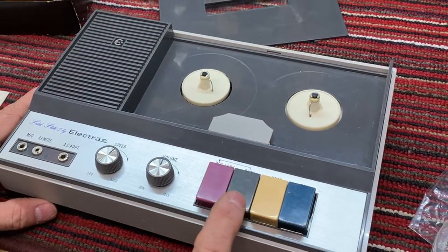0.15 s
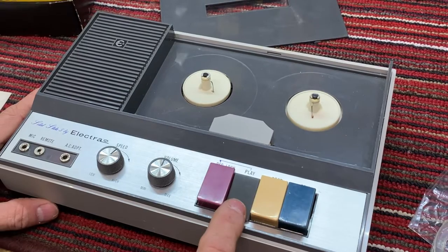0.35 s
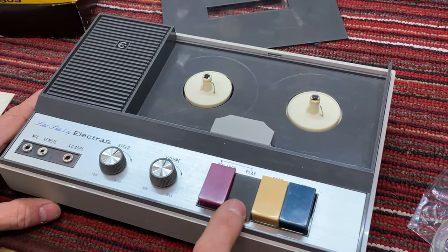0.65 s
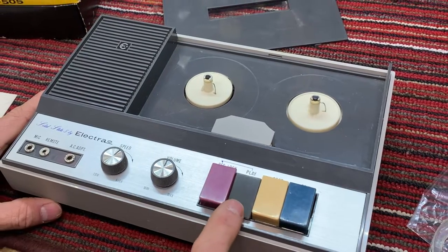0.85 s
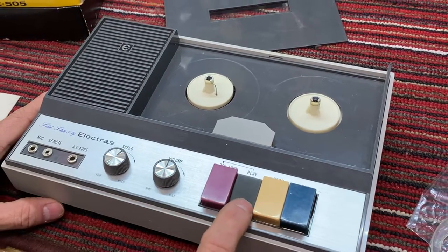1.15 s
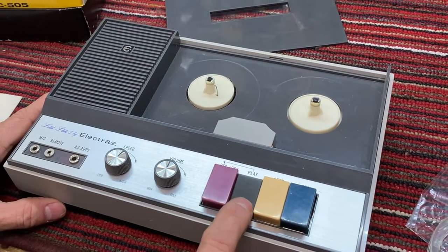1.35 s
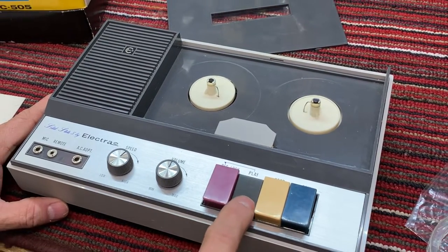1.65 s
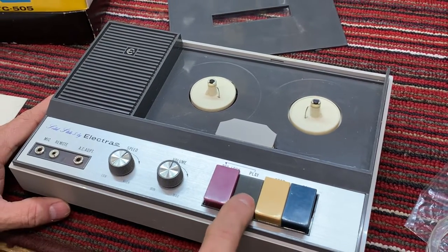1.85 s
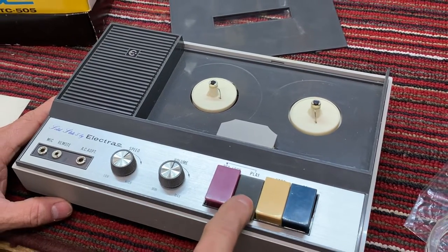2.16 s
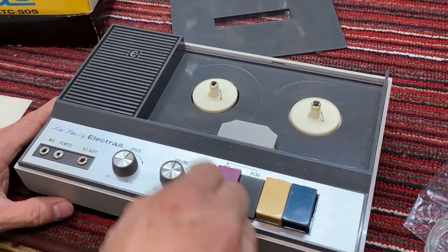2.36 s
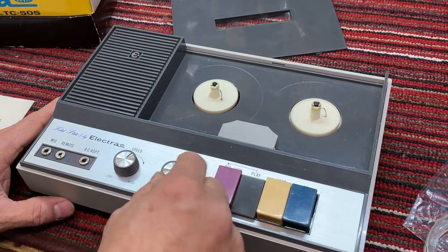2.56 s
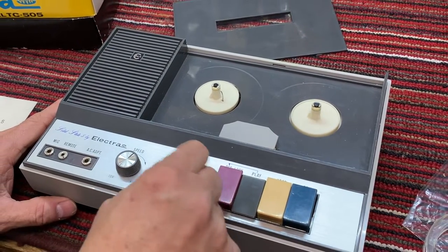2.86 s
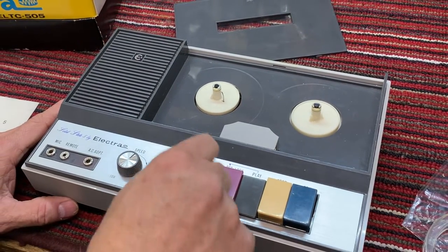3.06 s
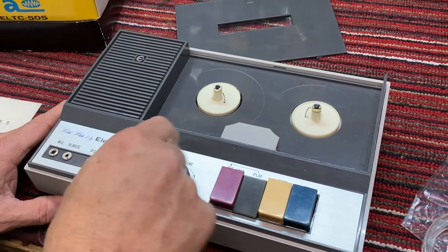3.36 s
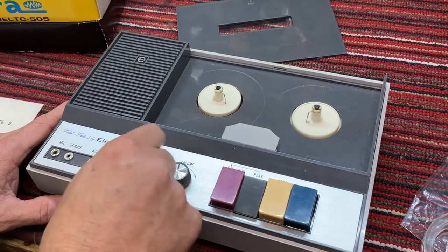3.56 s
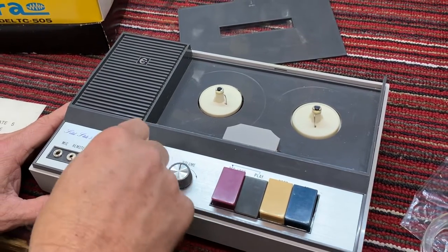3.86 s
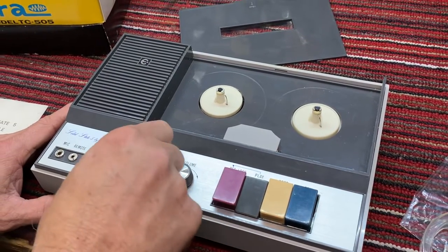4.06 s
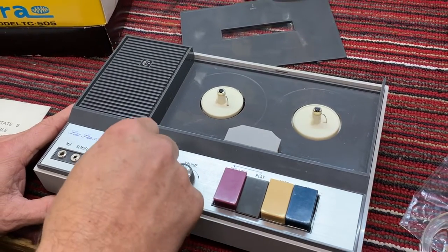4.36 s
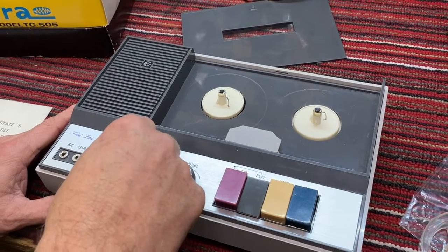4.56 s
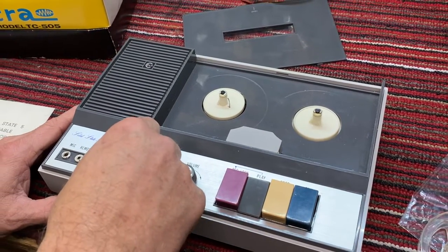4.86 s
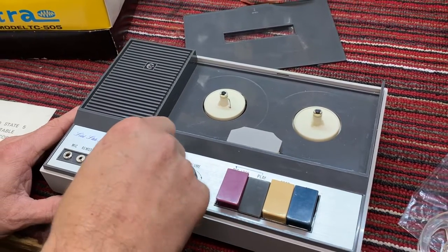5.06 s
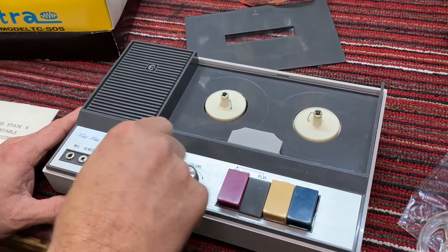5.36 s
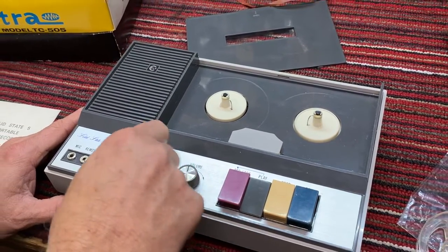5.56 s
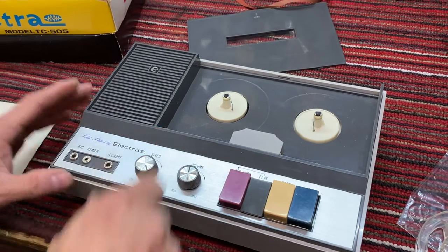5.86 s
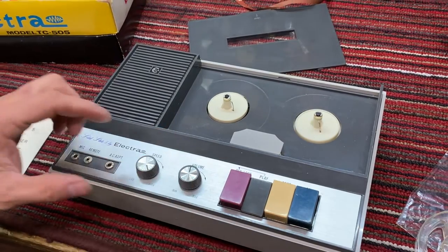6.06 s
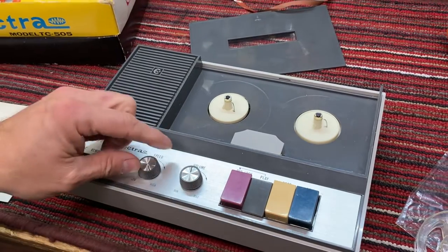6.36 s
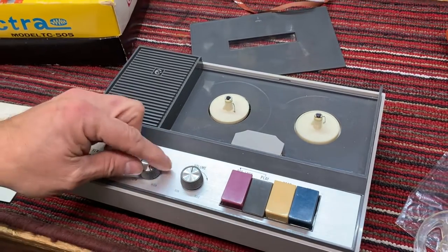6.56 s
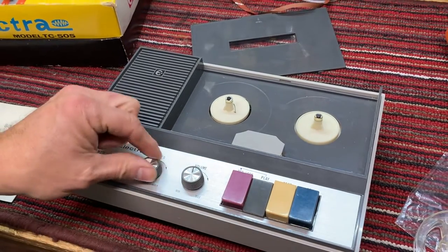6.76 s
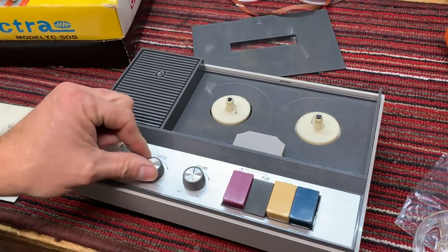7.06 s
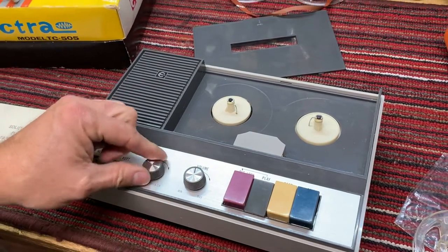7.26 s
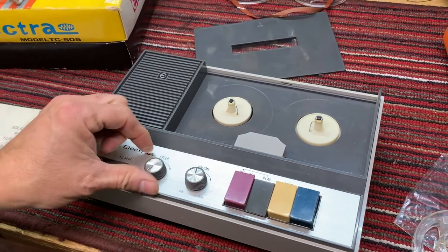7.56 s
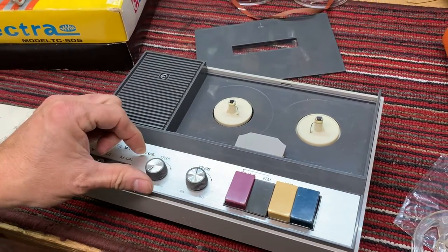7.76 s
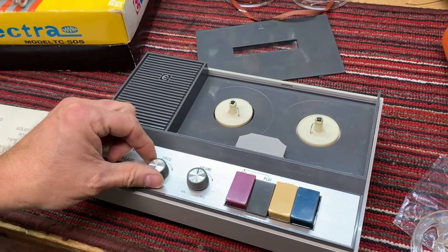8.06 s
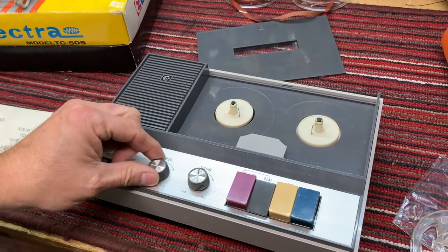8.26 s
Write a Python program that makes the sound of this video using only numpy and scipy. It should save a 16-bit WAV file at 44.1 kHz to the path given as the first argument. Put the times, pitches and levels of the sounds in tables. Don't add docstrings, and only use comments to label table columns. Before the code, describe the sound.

In a quiet room, close up, a chunky key on a small tape machine clacks down and the motor starts. The held key creaks and rattles with sharp clicks for about two seconds. Then the low, ticking motor hum runs on beneath faint knob rubs and taps, wavering in speed. After a soft low thump it winds down, nearly silent, then starts again.

```python
import sys
import numpy as np
from scipy import signal
from scipy.fft import rfft, irfft, next_fast_len
from scipy.io import wavfile
from scipy.ndimage import uniform_filter1d

SR = 44100
rng = np.random.default_rng(int(sys.argv[2]) if len(sys.argv) > 2 else 0)


def voltage_ratio(level):
    return 10 ** (np.asarray(level, float) / 20)


def inscribe(sig):
    pcm = np.round(np.clip(np.atleast_2d(sig).T, -1, 1) * 32767)
    wavfile.write(sys.argv[1], SR, pcm.astype(np.int16))


N = 370881
TIME = np.arange(N) / SR

# frequency in Hz, density in dB per Hz.
HUSH_SPECTRUM = [(28, -35.5), (55, 3.5), (120, 0), (300, -14), (800, -31), (2500, -36.5), (7000, -35),
                 (16000, -31.5)]
# start in seconds, level in dB, pitch in Hz, 60 dB decay time in seconds.
JOLTS = [
    (7.066, -24.5, 49, 0.26),
    (0.16, -45.5, 57, .25),
    (5.49, -36, 60, 0.37),
    (5.57, -41, 57, 0.29),
    (6, -42, 54, 0.17),
]

# start in seconds, length in seconds, peak in dB, place of peak from 0 to 1,
# panel share in dB.
KNOB_RUBS = [(.066, 0.063, -73.5, 1, 23), (3.47, .14, -61, 0.65, 9.5), (3.63, 0.18, -53, 0.41, 2),
             (3.81, 0.062, -70.5, 0.6, 8), (4.09, 0.25, -69.5, 0.8, 9), (4.4, 0.08, -69, 0.7, -4),
             (4.925, 0.15, -49.5, 0.42, 0.5), (5.243, 0.2, -55, 0.16, 11), (5.54, 0.09, -46, 0.09, 11.5),
             (5.61, 0.076, -54.5, .4, 5), (6.63, 0.15, -59, 0.4, 14), (6.87, 0.16, -55.5, 0.61, 9.5),
             (7.03, 0.37, -67, 0.34, -14), (7.23, .1, -56.5, 0.52, 7.5), (7.33, 0.16, -76.5, 0.16, 10),
             (7.95, 0.08, -71, 0.45, 4.5), (8.07, 0.17, -75.5, 0.14, 3), (8.25, .16, -83, 0.86, -1.5)]
# frequency in Hz, width in Hz, level in dB.
KNOB_MODES = [(1333, 170, 2.5), (1722, 160, 3.5), (2230, 120, -0.5), (2520, 320, 2), (2870, 140, -3),
              (3919, 710, -17)]
# frequency in Hz, width in Hz, level in dB.
PANEL_MODES = [(474.3, 170, -5.5), (746, 67, -4.5), (980, 700, 1.5)]

# start in seconds, length in seconds, peak in dB,
# place of peak from 0 to 1, latch share in dB.
KEY_CREAKS = [(.17, .03, -32, 0, 0.5), (.2, .055, -37, 0.93, -7), (.259, .106, -26, 0.57, -2),
              (.395, 0.084, -32, 0.66, 4), (.482, .06, -41.5, 0.2, -8.5), (.568, .065, -34, .6, 1),
              (.633, .055, -38.5, 0.38, -5), (.925, 0.051, -32.5, 0.71, -1.5), (1.045, 0.078, -35, 0.86, 2),
              (1.17, 0.055, -48.5, 0.4, 7), (1.235, .055, -38.5, 0.66, -10), (1.325, .025, -41.5, 0.4, 0),
              (1.365, .065, -36, 0.12, 0.5), (1.46, 0.077, -47, 0.13, -2), (1.57, 0.082, -37, 0.1, -2.5),
              (1.69, .05, -36.5, 0, -10), (1.76, 0.049, -35.5, 0.08, -12), (1.865, 0.051, -51, 0, -2),
              (1.935, .06, -33.5, 0.15, -8), (2.02, .05, -42, 0, 7), (2.09, 0.042, -45, 0.32, 0),
              (2.16, 0.055, -39, 0, 2)]
CASE_SHIFTS = [
    (7.285, .06, -52, 0.14, -25),
    (7.39, .06, -57.5, 0.5, -17),
    (8.052, 0.13, -59.5, 0.01, -18),
    (8.175, .15, -63, .7, -20),
    (8.325, 0.093, -64, 0.3, -26),
]

# start in seconds, snap in dB, case knock in dB, latch ring in dB.
KEY_PRESS = [
    (0.132, -29.5, -13.5, -33),
    (0.145, -3.5, -13, -22),
    (0.2603, -84, -38, -34.5),
    (0.3197, -43, -30, -44),
    (0.4058, -42, -27, -33.5),
    (0.5699, -66, -31.5, -41.5),
    (0.607, -47.5, -30, -39),
]
# start in seconds, snap in dB, case knock in dB, latch ring in dB.
KEY_RATTLE = [(0.9082, -30.5, -33.5, -41.5), (0.9186, -26, -29.5, -38), (0.9523, -38, -33, -40),
              (1.045, -46, -47, -42), (1.0998, -34, -44, -38), (1.1055, -45, -33.5, -58),
              (1.1599, -26.5, -24.5, -36.5), (1.1892, -55, -32, -42), (1.2387, -62, -36, -44),
              (1.3097, -50, -26, -37.5), (1.3173, -38, -27, -49), (1.3638, -23, -24.5, -34),
              (1.4456, -51, -29.5, -35), (1.5032, -28, -30, -36), (1.5655, -20.5, -55, -40),
              (1.5753, -36, -31.5, -36.5), (1.6122, -58, -49, -40), (1.6918, -32.5, -28.5, -38.5),
              (1.7484, -23.5, -39, -47), (1.754, -27, -34.5, -36), (1.8595, -28, -29, -36),
              (1.926, -25.5, -57, -42), (1.933, -28.5, -43, -40), (2.0258, -27, -26.5, -41),
              (2.0769, -26.5, -37, -41), (2.0869, -28, -30, -39.5), (2.1583, -23, -35, -39)]
# start in seconds, snap in dB, case knock in dB, latch ring in dB.
FINGER_TAPS = [(2.3999, -66.5, -38, -49.5), (2.818, -54.5, -70, -59.5), (2.9379, -61.5, -47, -55),
               (2.955, -70, -36, -58.5), (3.1529, -75, -48.5, -53.5), (3.4194, -66, -43.5, -56.5),
               (4.9278, -63, -41, -44), (4.946, -70, -43, -60), (5.252, -59.5, -46, -45),
               (5.272, -84, -41, -61.5), (5.484, -50, -38.5, -50.5), (5.534, -37.5, -36, -34.5),
               (5.581, -55.5, -33.5, -58), (7.9595, -64.5, -73, -67), (8.091, -72.5, -59, -60)]
# frequency in Hz, density in dB per Hz.
SNAP_SPECTRUM = [(3000, -19), (4500, -4.5), (6800, -0.5), (8500, 0.5), (11000, -3), (13000, -1.5),
                 (15300, -3.5), (16500, -38.5)]
# frequency in Hz, width in Hz, level in dB.
CASE_MODES = [(342.6, 45, -8.5), (444, 150, -1.5), (689, 32, -17.5)]
# frequency in Hz, width in Hz, level in dB.
LATCH_MODES = [(1040, 250, -6.5), (1580, 230, -2.5), (1852, 430, -7), (2293, 150, 0.5), (2762, 210, 2),
               (3155, 210, 1), (3810, 220, -12.5)]

# time in seconds, turns done.
SHAFT_TURNS = [(.1, -10), (.32, -7), (.659, 0), (2.224, 35), (3.467, 63), (3.91, 71), (4.104, 75),
               (4.453, 81), (4.85, 87), (5.209, 94), (5.413, 98), (5.728, 104), (6.003, 110), (6.567, 123),
               (6.975, 131), (7.395, 138), (8.08, 143), (8.53, 150)]
# time in seconds, shake of the base in dB, belt slip in dB.
MOTOR_LEVELS = [(.07, -70.5, -80.5), (.33, -52, -64), (.7, -48.5, -76.5), (1.1, -51, -60),
                (2.05, -51, -57.5), (2.25, -51, -72.5), (3.75, -49.5, -73), (3.92, -50, -84.5),
                (4.12, -50.5, -74), (4.54, -56, -78), (4.85, -50, -82), (6.3, -49, -72), (6.82, -50, -78),
                (7.48, -54, -89), (7.62, -76.5, -98), (8.04, -68, -94.5), (8.075, -65.5, -81.5),
                (8.41, -53.5, -75)]
# frequency in Hz, width in Hz, level in dB.
CHASSIS_MODES = [(1527, 250, 0.5), (1229.3, 340, -4), (1052.4, 260, -8), (876.3, 180, -5), (763, 230, -5.5),
                 (520, 120, -13.5), (326.1, 53, -19), (2684, 420, -14)]
# frequency in Hz, density in dB per Hz.
WHIRR_SPECTRUM = [(150, -24.5), (300, 6.5), (450, -1), (700, -9.5), (1500, -13), (1900, -26), (3500, -38.5),
                  (6500, -34.5), (10000, -30), (16000, -40)]
# start in seconds, end in seconds.
LOADED_SPANS = [(.65, 3.475), (3.9, 4.03), (4.05, 4.115), (4.7, 4.82), (4.84, 4.86), (5.08, 5.22),
                (5.39, 5.52), (5.71, 5.79), (5.815, 6.59), (6.61, 6.8), (6.85, 7.4)]
LOADED_TICK_DB = [-53.5, -73.5, -56.5, -78.5, -59.5, -70.5, -57, -71, -54.5, -66, -78]

# frequency in Hz, lead of the right port in radians.
PORT_PHASE = [(0, 0), (1200, -.5), (2000, -1.2), (2900, -2.8), (3700, -4.3), (4600, -5.5), (5200, -4.5),
              (5600, -3.1), (6300, 0), (8400, 3.14), (11100, 6.28), (13400, 9.42), (15900, 12.57)]
# frequency in Hz, left over right in dB.
LEFT_OVER_RIGHT = [(30, .8), (120, -.8), (300, 5.5), (1200, 3.5), (2500, -.5), (5500, -3), (8000, -.4)]
# frequency in Hz, room over direct sound in dB.
ROOM_OVER_DIRECT = [(60, -11), (150, -20), (350, -11), (600, -5), (1200, -3.5), (3000, -3), (5200, 0),
                    (6500, -21), (16000, -23)]

FULL_SHAKE_DB, USUAL_SLIP_DB = -51, -72


def noise():
    return rng.standard_normal(N)


def evened(x):
    return x / np.sqrt(np.mean(x ** 2) + 1e-20)


def read(points, hz):
    f, value = np.transpose(points)
    return np.interp(np.log(hz + 1), np.log(f + 1), value)


def columns(rows):
    s, *cols = np.transpose(rows)
    return [np.interp(TIME, s, c) for c in cols]


def strokes(rows, rise_db, fall_db):
    gain, share_db, done, pressure = np.zeros((4, N))
    for s, length, db, peak, share in rows:
        part = slice(round(s * SR), min(round((s + length) * SR), N))
        u = (TIME[part] - s) / length
        knots = [0, np.clip(peak, .02, .98), 1]
        gain[part] = voltage_ratio(db - np.interp(u, knots, [rise_db, 0, fall_db]))
        share_db[part] = share
        done[part] = u
        pressure[part] = np.interp(u, knots, [0, 1, 0])
    return uniform_filter1d(gain, size=300), share_db, done, pressure


def coloured(x, spectrum):
    size = next_fast_len(N)
    gain = voltage_ratio(read(spectrum, np.fft.rfftfreq(size, 1 / SR)))
    return evened(irfft(rfft(x, size) * gain, size)[:N])


def ring(x, hz, width):
    return signal.lfilter([1], [1, -np.exp((2j * hz - width) * np.pi / SR)], x).imag


def body(x, modes):
    return sum(voltage_ratio(db) * ring(x, hz, width) for hz, width, db in modes)


def band(x, hz, width):
    return ring(ring(x, hz, width), hz, width) * (2 * np.pi * width / SR) ** 2


def pulses(cycles, spread_db):
    whole = np.floor(cycles)
    return np.diff(whole, prepend=whole[0]) * voltage_ratio(spread_db * noise())


def flicker(size, depth_db):
    return voltage_ratio(depth_db * evened(uniform_filter1d(noise(), size)))


def latch_ring(x):
    lowpass = signal.butter(10, 4400, fs=SR, output="sos")
    return signal.sosfilt(lowpass, body(x, LATCH_MODES))


def hush():
    return voltage_ratio(-68) * coloured(noise(), HUSH_SPECTRUM)


def bump(s, db, hz, t60):
    t = np.maximum(TIME - s, 0)
    sag = t + .023 * (1 - np.exp(-t / .011))
    onset = 1 - np.exp(-(t / .005) ** 2)
    return voltage_ratio(db - 60 * t / t60) * onset * np.sin(2 * np.pi * hz * sag)


def rub():
    gain, panel_db, _, pressure = strokes(KNOB_RUBS, rise_db=12, fall_db=24)
    hiss_db = -16 + 9 * pressure
    grains = rng.random(N) < 500 / SR
    grit = noise() * (1 + 6 * grains) * flicker(size=350, depth_db=0.5)
    hiss = evened(band(grit, 6600, 2600)) + coloured(grit, SNAP_SPECTRUM)
    knob = voltage_ratio(8.0) * evened(body(grit, KNOB_MODES))
    panel = voltage_ratio(panel_db) * evened(body(grit, PANEL_MODES))
    return gain * (knob + voltage_ratio(hiss_db) * hiss + panel)


def creak():
    gain, share_db, done, _ = strokes(KEY_CREAKS + CASE_SHIFTS, rise_db=9.5, fall_db=19)
    latch_db = share_db - 10.5 * done
    slips_per_s = 190 * (1 - .1 * done)
    slips = pulses(np.cumsum(slips_per_s * flicker(size=300, depth_db=1.2)) / SR, 2.)
    slips = slips + .025 * noise()
    fizz = voltage_ratio(-25.5) * coloured(slips, SNAP_SPECTRUM)
    latch = evened(latch_ring(slips)) + fizz
    return gain * (evened(body(slips, CASE_MODES)) + voltage_ratio(latch_db) * latch)


def clicks():
    hits = np.zeros((3, N))
    s, *levels_db = np.transpose(KEY_PRESS + KEY_RATTLE + FINGER_TAPS)
    hits[:, np.round(s * SR).astype(int)] = voltage_ratio(np.array(levels_db))
    t = TIME[:8000]
    fast = voltage_ratio(-60 * t / 0.046)
    wash = voltage_ratio(-33.5 - 60 * t / 0.63)
    contact = .8 * voltage_ratio(-60 * t / 0.0016)
    jolt = voltage_ratio(-60 * t / 0.043)
    snap = signal.oaconvolve(hits[0], fast + wash + contact)[:N] * coloured(noise(), SNAP_SPECTRUM)
    push = signal.oaconvolve(hits[1], np.hanning(70) / 25)[:N]
    knock, latch = (signal.oaconvolve(h, jolt)[:N] * noise() for h in hits[1:])
    case = voltage_ratio(-16.0) * body(knock + 4 * push, CASE_MODES)
    return voltage_ratio(-5.5) * snap + case + voltage_ratio(-16) * latch_ring(latch + 3 * hits[2])


def load(shake_db):
    gain = voltage_ratio(-76 + shake_db - FULL_SHAKE_DB)
    for (a, b), db in zip(LOADED_SPANS, LOADED_TICK_DB):
        build_db = 300 * np.maximum(a - TIME, 0)
        drop_db = 400 * np.maximum(TIME - b, 0)
        gain = gain + voltage_ratio(db - build_db - drop_db)
    return gain


def wheel_tick(turns):
    knock = pulses(turns + .06, .9)
    chatter = signal.lfilter([1], [1, -.997], knock) * noise()
    drive = knock + .4 * np.roll(knock, 340) + .028 * chatter
    tick = np.zeros(N)
    for hz, width, db in CHASSIS_MODES:
        delay = round(abs(1570 - hz) / 5)
        tick += voltage_ratio(db) * np.roll(band(drive, hz, width), delay) * SR / width
    return evened(tick)


def motor():
    turns, = columns(SHAFT_TURNS)
    throb_db, belt_db = columns(MOTOR_LEVELS)
    shake_change = throb_db - FULL_SHAKE_DB
    rumble_db = -60.5 + .12 * shake_change
    whirr_db = -57.5 + 0.65 * shake_change + 0.56 * (belt_db - USUAL_SLIP_DB)
    shake = pulses(turns - .22, 0.98) + 0.0076 * noise()
    throb = evened(band(shake, 126, 38) + .15 * band(shake, 200, 70))
    rumble = evened(band(noise(), 58, 20))
    stir = 1 + 0.17 * np.cos(2 * np.pi * (turns - .1))
    brushes = voltage_ratio(-28.0) * evened(band(noise(), 6900, 500)) * stir
    whirr = coloured(noise(), WHIRR_SPECTRUM) * stir * flicker(size=900, depth_db=2.0)
    belt = evened(body(noise(), [(2460, 230, -2.5), (2950, 390, 0.5)]))
    belt = belt * flicker(size=700, depth_db=1.5)
    whine = voltage_ratio(-10) * np.sin(2 * np.pi * 12 * uniform_filter1d(turns, size=3000))
    base = voltage_ratio(throb_db) * throb + voltage_ratio(rumble_db) * rumble
    running = voltage_ratio(belt_db + 4.0) * belt + voltage_ratio(whirr_db + 2.0) * (whirr + whine)
    return base + running + load(throb_db) * (wheel_tick(turns) + brushes)


def ports(x):
    size = next_fast_len(N + 8000)
    hz = np.fft.rfftfreq(size, 1 / SR)
    phase = np.interp(hz, *np.transpose(PORT_PHASE))
    half = voltage_ratio(read(LEFT_OVER_RIGHT, hz) / 2) * np.exp(-.5j * phase)
    tails = rng.standard_normal((3, 2, 5000)) * voltage_ratio(-60 * TIME[:5000] / .07)
    shares = np.sqrt(2 / 3) * np.cos(np.pi * (4 * TIME + np.arange(3)[:, None] / 3))
    room = 0
    for share, tail in zip(shares, tails):
        room = room + rfft(x * share, size) * rfft(tail / np.linalg.norm(tail[0]), size)
    direct = rfft(x, size) * np.array([half, 1 / half])
    return irfft(direct + room * voltage_ratio(read(ROOM_OVER_DIRECT, hz)), size)[:, :N]


def scene():
    jolts = sum(bump(*row) for row in JOLTS)
    highpass = signal.butter(4, 235, "high", fs=SR, output="sos")
    case = signal.sosfilt(highpass, rub() + creak() + clicks())
    return ports(hush() + jolts + case + motor())


def roll_off(x):
    return signal.sosfilt(signal.butter(12, 17150, fs=SR, output="sos"), x)


def record(dry):
    cut = signal.sosfilt(signal.butter(3, 33, "high", fs=SR, output="sos"), dry)
    overloaded = 0.83 * np.tanh(cut / 0.99)
    edge = signal.firwin(255, 16050, fs=SR)[None]
    mix = signal.oaconvolve(overloaded, edge, "same")
    return roll_off(mix)


dry = scene()
out = record(dry)
inscribe(out)
```